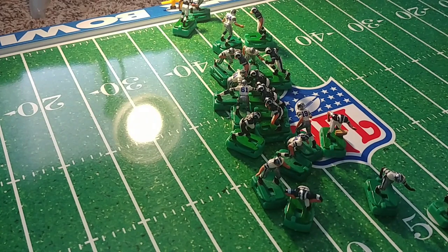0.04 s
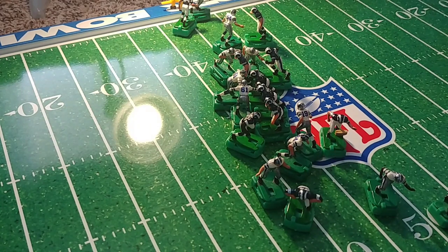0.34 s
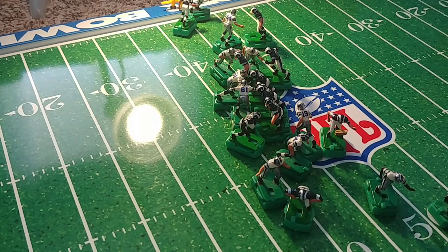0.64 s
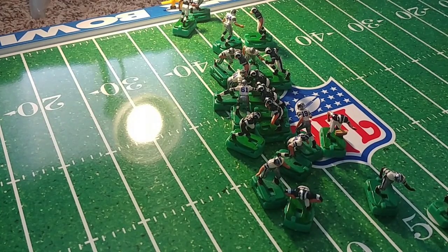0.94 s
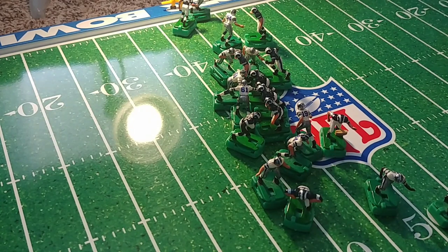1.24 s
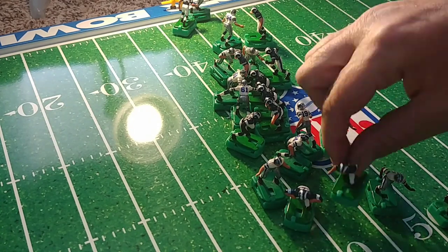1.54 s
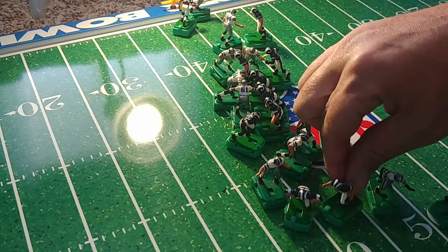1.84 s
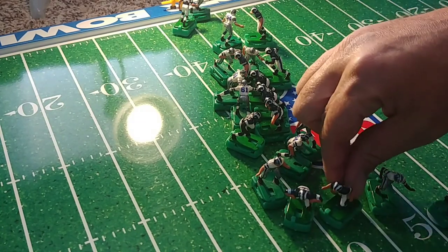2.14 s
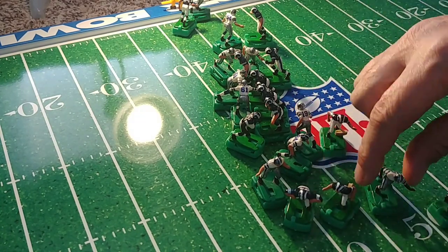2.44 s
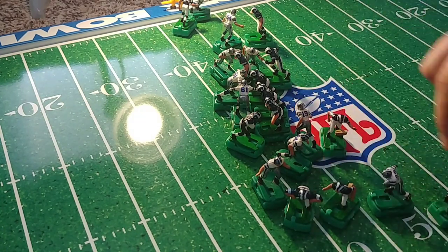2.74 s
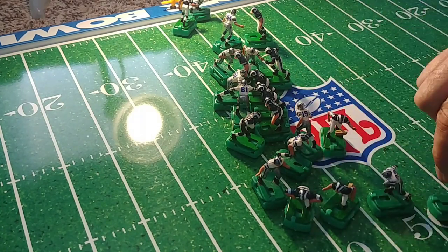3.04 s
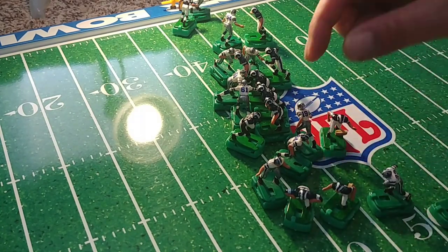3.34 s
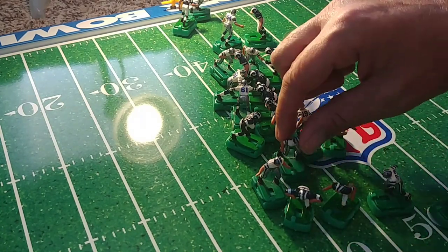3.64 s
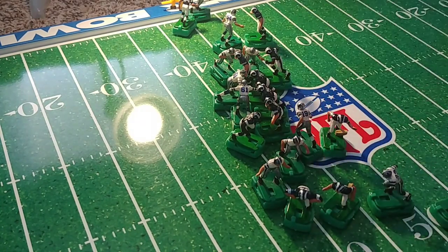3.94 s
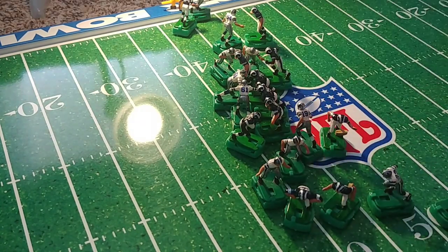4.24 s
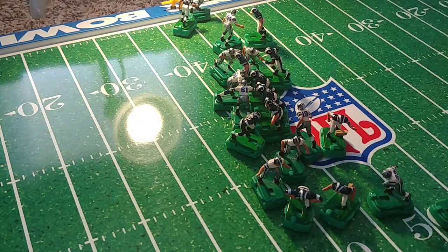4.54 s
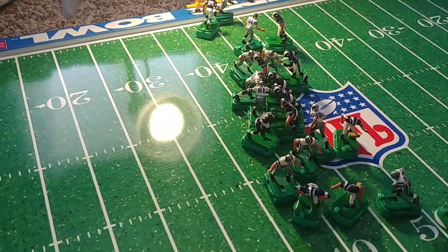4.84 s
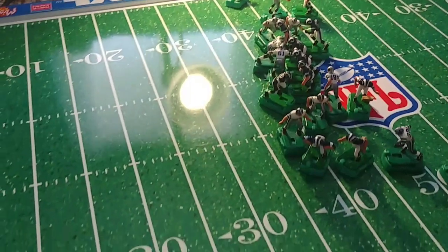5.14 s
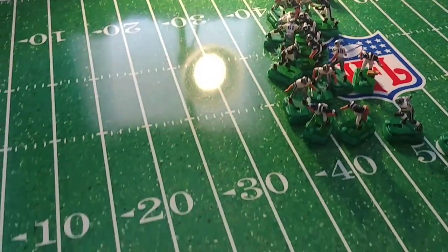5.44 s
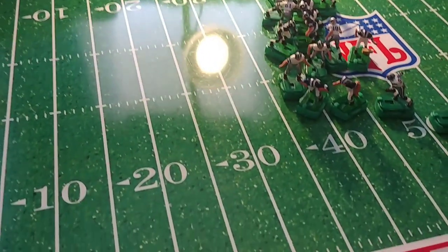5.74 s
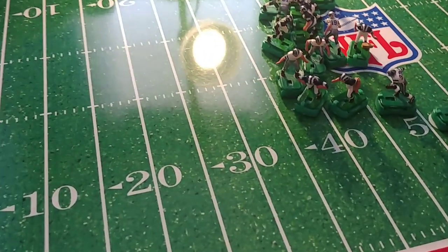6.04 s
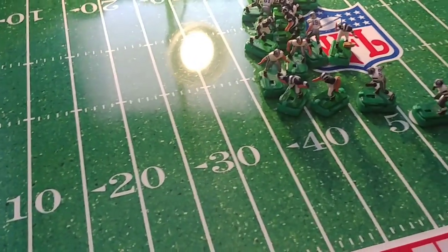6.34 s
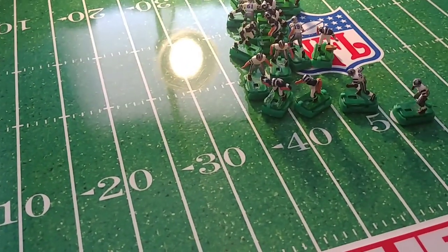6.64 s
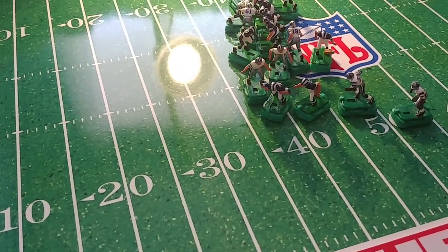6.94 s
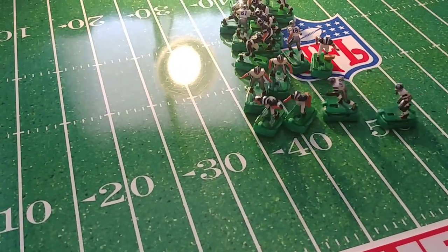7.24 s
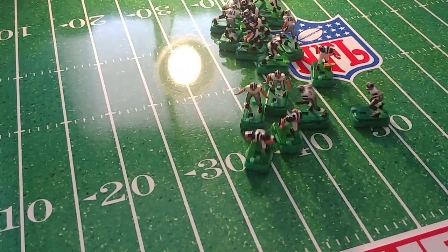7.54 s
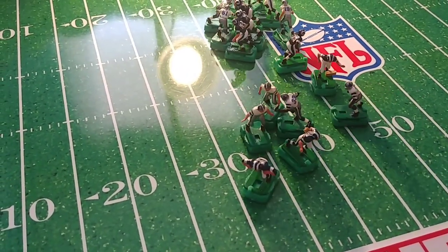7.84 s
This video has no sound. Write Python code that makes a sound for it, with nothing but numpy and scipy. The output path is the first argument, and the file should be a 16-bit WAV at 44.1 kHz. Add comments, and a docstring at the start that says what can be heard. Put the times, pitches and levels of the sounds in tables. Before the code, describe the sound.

An electric football game switches on with a snap about seven seconds in, giving a loud, bright metallic buzz mixed with the rattle of hopping plastic figures. Everything before it is much quieter: gentle taps of figures being placed, low bumps and scuffs of handling, a few hard plastic clicks, and the faint ticking and whirring of a focusing lens beside the microphone, over soft indoor ventilation.

```python
"""An electric football game: a vibrator hammers a metal sheet 120 times a second, forcing a harmonic
drone from it, and small plastic players hop and rattle on top. It starts late, with the snap of a switch.
Before that a hand sets the players on the field with soft taps, dull bumps and hard clicks, while a lens
motor close to the microphone ticks and whirs. Soft scuffs, a low rumble of a hand on the camera, faint
rustles and ventilation lie beneath, in a quiet room."""
import sys
import numpy as np
from scipy import signal
from scipy.fft import rfft, irfft, next_fast_len
from scipy.io import wavfile

SR = 44100
rng = np.random.default_rng(int(sys.argv[2]) if len(sys.argv) > 2 else 0)


def master(y):
    """Save y as 16-bit WAV."""
    cut = np.clip(np.atleast_2d(y).T, -1, 1)
    pcm = np.round(cut * 32767)  # scale
    wavfile.write(sys.argv[1], SR, pcm.astype(np.int16))


N = 348379
TIME = np.arange(N) / SR
BUZZ_HZ, CUTOFF_HZ = 119.982, 15780
SWITCH_S, FIRST_BLOW_S = 7.095, 7.107

# spectrum of a hard impact on the sheet: (frequency [Hz], relative level [dB])
SHEET_COLOUR = [(40, -17), (70, -12.5), (135, -17), (280, -6), (450, -7.5), (1100, -8.5), (2000, -5),
                (4400, -7), (5400, -4), (6800, -3), (8000, -6.5), (10300, -20), (11800, -13.5),
                (15500, -13)]
# spectrum of a soft touch: (frequency [Hz], relative level [dB])
TOUCH_COLOUR = [(80, -4), (190, 2), (350, 1.5), (620, -2), (900, -4.5), (1500, -21), (3000, -23.5),
                (8000, -35)]


def game():
    """Transient and steady state: the switch snaps, the hammer meets the sheet and keeps it vibrating."""
    # spectrum of the switch: (frequency [Hz], relative level [dB])
    snap_colour = [(300, -19), (4000, -31), (7300, 4.0), (10500, -18), (14500, -4)]
    out, t = np.zeros((2, N)), TIME[:N - int(SWITCH_S * SR)]
    drone_db, rattle_db = swing(t + SWITCH_S)
    add(out, SWITCH_S, amp(drone_db - 0.13) * drone(t) + amp(rattle_db) * rattle(t))
    add(out, SWITCH_S, amp(-9.5) * knock(snap_colour, t60=0.031, tail_db=-22, tail_t60=.15))
    add(out, FIRST_BLOW_S, amp(-15.5) * knock(SHEET_COLOUR, t60=0.056, tail_db=-17, tail_t60=0.26))
    return out


def swing(s, swing_up_s=0.0034, jolt_db=5, settle_s=0.1, ease_at_s=7.83, ease_s=0.036):
    """Exponential build-up: gains in dB of drone and rattle, which idle until the first blow."""
    since = np.maximum(s - FIRST_BLOW_S, 0)
    idle = np.exp(-since / swing_up_s)
    eased = ramp((s - ease_at_s) / ease_s)   # late on, the drone recedes and the rattle comes forward
    drone_db = -32 * idle - 4 * eased
    hopping_db = -15 + jolt_db * np.exp(-since / settle_s) + 1.5 * eased
    return drone_db, -20.5 * idle + hopping_db * (1 - idle)


def drone(t, treble_hz=4600, waver_db=1.12, slip_rad=0.19):
    """Forced vibration: periodic blows drive harmonics, which waver as the moving players load the sheet."""
    # harmonics that meet a resonance of the sheet: (harmonic number, relative level [dB],
    # drift as the players travel [dB/s], left minus right [dB], left-right correlation)
    resonances = [(2, -34.8, -1, -1, 1.0), (3, -27.2, -4, -1, 0.7), (4, -34.5, 1, -1, 0.6),
                  (5, -29.6, -1, 1, 1.0), (6, -34.9, 2, -9, -0.4), (7, -27.2, -3, 4, -1.0),
                  (8, -28.2, -4, -3, 0.3), (9, -37.3, -3, -1, 0.5), (12, -26.3, -3, 13, 0.7),
                  (14, -25.4, 0, 7, -0.9), (15, -30.1, -5, -5, 0.9), (18, -30.0, -2, 2, 0.9),
                  (24, -29.3, 3, -10, 0.8), (25, -30.0, -4, 8, -0.4), (28, -26.5, 3, -4, -0.2),
                  (32, -28.7, 3, 10, 0.7), (33, -25.4, 3, 2, -0.5), (37, -28.4, 3, -2, -1.0),
                  (43, -24.3, 10, -3, 1.0), (44, -27.9, 2, 3, 0.9), (47, -28.4, 8, 6, 0.9),
                  (51, -26.1, 1, 2, 0.8), (53, -25.7, 15, -2, 0.7), (54, -28.2, -2, -5, -0.9),
                  (55, -21.1, -4, -8, -0.9), (56, -23.9, -2, -2, -0.5), (58, -27.9, -4, 0, -0.5),
                  (60, -24.4, 4, 5, -0.9), (61, -28.1, 5, 1, -0.4), (62, -24.6, 0, 9, 0.1)]
    # envelope of all other harmonics: (frequency [Hz], relative level [dB])
    off_resonance = [(120, -53), (1200, -38), (2400, -37), (3500, -38), (4500, -37), (5800, -34),
                     (6800, -35), (7800, -35), (8600, -43), (10000, -54), (12500, -50), (15500, -51)]
    # the sheet's high modes as the players travel: (time [s], gain [dB])
    treble_curve = [(7.11, -2), (7.2, -0.5), (7.48, 0.8), (7.65, -0.8), (7.83, -1.5), (7.87, -3)]
    treble_db = np.interp(t + SWITCH_S, *np.transpose(treble_curve))
    resonant = {round(row[0]): row[1:] for row in resonances}
    out = np.zeros((2, len(t)))
    for k in range(1, int(CUTOFF_HZ / BUZZ_HZ)):
        hz = k * BUZZ_HZ
        scatter = rng.normal(size=4) * [1.8, 4, 3, 1]
        weak = (at_hz(off_resonance, hz) + scatter[0], scatter[1], scatter[2], .4 * np.tanh(scatter[3]))
        level_db, drift, pan_db, correlation = resonant.get(k, weak)
        ear_phase = np.arccos(correlation) * rng.choice([-1, 1]) * np.array([[.5], [-.5]])
        phase = 2 * np.pi * (hz * t + rng.random())
        phase += slip_rad * np.sqrt(hz / treble_hz) * wander(10.5, len(t))
        swell_db = treble_db * (hz > treble_hz) + drift * (t - t[-1] / 2)
        swell_db += waver_db * wander(8.5, len(t))
        out += np.sqrt(2) * amp(level_db + swell_db) * panned(pan_db) * np.cos(phase + ear_phase)
    return out


def rattle(t, scatter_s=.0017, uneven_db=2.5, roam_db=3.0, players=12):
    """Impact excitation: each player lands once a cycle, a little early or late, and rings the sheet."""
    # modes kept ringing: (frequency [Hz], bandwidth [Hz], relative level [dB], left minus right [dB])
    modes = [(292, 23, -22.5, -4), (2100, 65, -19, -9), (6400, 120, -13, -10), (6700, 160, -16, 0),
             (7760, 170, -8.5, 26), (8160, 200, -7, 29)]
    out, margin = np.zeros((2, len(t))), SR // 4
    cycles = np.arange(-8, t[-1] * BUZZ_HZ + 1)
    for player in range(players):
        landings = (cycles + player / players) / BUZZ_HZ + scatter_s * rng.standard_normal(len(cycles))
        blows = np.zeros(len(t) + 2 * margin)
        blows[(landings * SR).astype(int) + margin] = amp(uneven_db * rng.standard_normal(len(cycles)))
        blows *= amp(roam_db * wander(1.99, len(blows)))   # livelier and calmer spots of the field
        response = knock(SHEET_COLOUR, t60=0.12, tail_db=-10, tail_t60=0.34)
        out += signal.fftconvolve(blows[None], response, axes=1)[:, margin:margin + len(t)]
    ringing = np.zeros_like(out)
    for hz, width_hz, db, pan_db in modes:
        resonator = signal.iirpeak(hz, hz / width_hz, fs=SR)
        ringing += amp(db) * panned(pan_db) * unit(signal.lfilter(*resonator, out))
    return unit(unit(out) + 0.51 * ringing)


def clicks(crack_db=-19.0, ring_db=-10.0):
    """Free vibration: hard plastic cracks, then its damped modes reach each ear in a phase of their own."""
    # hard contacts: (time [s], relative level [dB])
    contacts = [(4.943, -50), (5.2926, -33.5), (5.3006, -38), (6.0392, -31.5)]
    # spectrum of the crack: (frequency [Hz], relative level [dB])
    colour = [(1000, -12), (2400, -9), (3700, 2), (6000, -10), (7200, -19), (12000, -33)]
    # modes of the plastic: (frequency [Hz], relative level [dB], time to fall 60 dB [s])
    modes = [(1404, -13, 0.056), (2430, -8.5, 0.059), (3530, -3, 0.096), (3696, -3, 0.067),
             (3900, -4, 0.065), (4300, -1, .04), (4500, -9, 0.088), (5160, -13, .07), (5800, -5.5, 0.054),
             (6100, -11, .05)]
    out, t = np.zeros((2, N)), TIME[:SR // 4]
    for s, db in contacts:
        ring = sum(amp(mode_db - 60 * t / t60) * np.sin(2 * np.pi * (hz * t + rng.random((2, 1))))
                   for hz, mode_db, t60 in modes)
        crack = knock(colour, t60=0.029, tail_db=-3.5, tail_t60=0.24)
        add(out, s, amp(db + ring_db) * ring + amp(db + crack_db) * crack)
    return out


def taps(gain_db=-8.0, rise_s=0.0015):
    """Soft impact: a player set down gently excites mostly the low modes of the field."""
    # players set down and nudged: (time [s], relative level [dB])
    touches = [(1.773, -42), (2.505, -49), (2.534, -51), (2.602, -51), (2.936, -51), (3.189, -50),
               (3.33, -49.5), (3.548, -46.5), (3.621, -43)]
    out = np.zeros((2, N))
    rise = 1 - np.exp(-TIME[:SR // 4] / rise_s)
    for s, db in touches:
        add(out, s, amp(db + gain_db) * rise * knock(TOUCH_COLOUR, t60=0.068, tail_db=-13, tail_t60=.3))
    return out


def bumps(gain_db=3.0, t60=0.034, flesh_s=0.0023, lead_s=.02):
    """Damped oscillation: soft flesh builds its push gradually, and the thud dies in a few cycles."""
    # bumps of the hands: (time [s], relative level [dB], frequency [Hz], left minus right [dB])
    thuds = [(1.554, -46, 105, -13), (2.509, -45, 80.7, -14), (2.932, -39.5, 76, -21),
             (2.952, -46, 76, -10), (3.004, -44.5, 86.1, -10), (3.329, -37.5, 115, 2),
             (3.345, -44.5, 115, 7), (3.62, -36, 101, 1.5), (3.637, -40, 100, 3), (4.095, -23, 81, -27),
             (4.123, -36.5, 64.6, -21), (4.777, -46.5, 80.7, 6), (6.234, -45, 99, 4),
             (6.765, -45, 72.7, 0.5)]
    out, t = np.zeros((2, N)), TIME[:SR // 4] - lead_s
    rise = np.exp(-(np.minimum(t - flesh_s, 0) / flesh_s) ** 2 / 2)
    fall = amp(-60 * np.maximum(t - flesh_s, 0) / t60)
    for s, db, hz, pan_db in thuds:
        add(out, s - lead_s, amp(db + gain_db) * panned(pan_db) * rise * fall * np.sin(2 * np.pi * hz * t))
    return out


def scuffs_and_rumble(gain_db=0.5):
    """Handling noise: short soft scuffs, and a longer low rumble of a hand handling the camera."""
    # the scuffs and the one long rumble: (start [s], length [s], relative level [dB])
    swells = [(0.05, 0.23, -63.5), (2.492, 0.085, -60), (2.578, 0.045, -61), (2.91, 0.067, -62),
              (3.592, .15, -65), (4.2, 0.77, -68.5), (6.73, .1, -65)]
    return amp(gain_db) * noise_swells(swells, TOUCH_COLOUR, flutter_db=8.0, flutter_hz=41.4)


def lens_steps(clock_start_s=.0978, period_s=.09862, jitter_s=.002, lead_s=0.0035, gain_db=-7.5):
    """Pulse train: the lens hunts for focus in short, slightly uneven steps on a steady clock."""
    # spells of stepping: (start [s], end [s], first relative level [dB], last relative level [dB])
    hunts = [(0.1, 0.2, -57.5, -59.5), (0.39, 0.59, -57, -68), (0.69, 0.79, -59, -52),
             (0.89, 1.68, -67, -62), (1.77, 2.66, -60, -60.5), (2.96, 2.96, -59, -59),
             (3.16, 3.35, -69, -67), (3.45, 4.04, -59.5, -57.5), (4.24, 4.93, -60.5, -59.5)]
    # spectrum of a step: (frequency [Hz], relative level [dB])
    colour = [(1500, -14), (3300, -3), (4400, -14), (5600, -1), (6800, -10.5), (7800, 4.5), (9000, -16.5),
              (10500, -22), (15000, -11)]
    out, t = np.zeros((2, N)), TIME[:SR // 10]
    slide = np.minimum(t / 0.0032, 1) * (np.exp(-(t / .02) ** 4) + 0.2 * np.exp(-t / .025))
    for start, end, first_db, last_db in hunts:
        first, last = [round((s - clock_start_s) / period_s) for s in (start, end)]
        ticks = clock_start_s + period_s * np.arange(first, last + 1)
        for s, db in zip(ticks, np.linspace(first_db, last_db, len(ticks))):
            late_s, uneven_db = rng.standard_normal(2) * [jitter_s, 0.8]
            add(out, s - lead_s + late_s, amp(db + gain_db + uneven_db) * slide * noise(colour, len(t)))
    return out


def lens_runs(brake_db_per_s=298, full_speed_db=-53, hiss_hz=10500, grain_db=0.4):
    """Machine noise grows louder and brighter with speed: the lens motor speeds up, whirs and brakes."""
    # unbroken runs: (start [s], time to reach speed [s], time until braking [s], level [dB])
    runs = [(5.22, .02, .025, -68), (5.489, 0.081, 0.18, -50), (5.86, .13, 0.22, -48),
            (6.04, .15, 0.21, -51), (6.396, .015, .03, -59.5), (6.78, .025, 0.027, -68)]
    # spectrum of the whir: (frequency [Hz], relative level [dB])
    colour = [(880, -43), (1500, -16), (1770, -25), (2040, -23), (2410, -16.5), (2600, -17), (3390, -11),
              (4980, -15.5), (6760, -11.5), (7760, -1.5), (8230, -5), (10600, -27.5), (12200, -18),
              (14900, -11.5), (15800, -8)]
    power = np.zeros(N)
    for start, speed_up, length, db in runs:
        braking = np.maximum(TIME - start - length, 0)
        power += (amp(db - brake_db_per_s * braking) * ramp((TIME - start) / speed_up)) ** 2
    level, whir = np.sqrt(power), noise(colour, N)
    hiss = signal.sosfiltfilt(signal.butter(2, hiss_hz, "high", fs=SR, output="sos"), whir)
    brightness = (level / amp(full_speed_db)) ** .4
    return level * amp(grain_db * wander(45, N)) * (whir + (brightness - 1) * hiss)


def rustles():
    """Modulated noise: faint dry rustles close by swell and fade unevenly."""
    # rustles: (start [s], length [s], relative level [dB])
    swells = [(4.02, .17, -70), (4.22, 0.14, -73), (4.48, .26, -73)]
    # their spectrum: (frequency [Hz], relative level [dB])
    colour = [(1000, 3), (3000, -1), (5000, -1), (7700, 0), (10000, -12), (15000, -12)]
    return noise_swells(swells, colour, flutter_db=-3.0, flutter_hz=40)


def room(move_at_s=4.85, move_s=.25):
    """A sound field varies with position: the microphone moves between two places by the table."""
    # rumble at each place: (frequency [Hz], relative level [dB])
    first_colour = [(25, -12), (50, -8.5), (80, -1.5), (135, -5.5), (220, -11.5), (400, -11), (560, -20.5),
                    (880, -15), (1100, -22.5), (1500, -19.5), (2000, -30.5), (4000, -34.5), (10000, -43.5),
                    (15500, -45)]
    later_colour = [(30, -28), (60, -3.5), (110, 0), (240, -16), (350, -7.5), (520, -20.5), (800, -19),
                    (1050, -22.5), (1450, -21.5), (2000, -31), (4000, -35), (8000, -41.5), (10000, -46),
                    (15500, -45)]
    # hums at each place: (frequency [Hz], bandwidth [Hz], level [dB])
    first_hums = [(79, 2.7, -66), (134.6, 2.7, -65.5), (341, 33, -73), (904, 19, -83.5)]
    later_hums = [(64, 4.8, -62.5), (98, 9.6, -60.5), (311, 12, -69), (368, 5.2, -67), (747, 14, -73)]
    first = ventilation(first_colour, first_hums, rumble_db=-59.5)
    later = ventilation(later_colour, later_hums, rumble_db=-56.0)
    moved = np.clip((TIME - move_at_s) / move_s + .5, 0, 1)
    return np.sqrt(1 - moved) * first + np.sqrt(moved) * later


def ventilation(colour, hums, rumble_db, pan_db=3.0):
    """Broadband and narrowband noise: a rumble with a few unsteady hums, louder on the left."""
    out = amp(rumble_db) * noise(colour, N, lean=1.0)
    for hz, width_hz, db in hums:
        phase = 2 * np.pi * hz * TIME
        hum = wander(width_hz, N) * np.cos(phase) + wander(width_hz, N) * np.sin(phase)
        out += amp(db) * panned(pan_db) * hum
    return out


def knock(colour, t60, tail_db, tail_t60):
    """Impulse response of a body with crowded modes: a fast ring, then the room's tail."""
    t = TIME[:SR // 4]
    return noise(colour, len(t)) * (amp(-60 * t / t60) + amp(tail_db - 60 * t / tail_t60))


def noise_swells(swells, colour, flutter_db, flutter_hz):
    """Amplitude modulation: bursts of noise rise and fall with a random flutter."""
    out = np.zeros((2, N))
    for s, length, db in swells:
        size = int(length * SR)
        flutter = flutter_db * np.tanh(wander(flutter_hz, size))
        add(out, s, amp(db + flutter) * np.hanning(size) * noise(colour, size))
    return out


def noise(colour, size, lean=0.0):
    """Partial coherence: coloured stereo noise of rms 1, more alike in both ears in the bass."""
    # stereo width: (frequency [Hz], side minus mid [dB])
    widths = [(40, -2.5), (150, -9.5), (330, -7.5), (600, -3.5), (1500, 1), (15000, -1)]
    # the room's lean to the left: (frequency [Hz], left minus right [dB])
    balance = [(60, 0.5), (400, 3), (900, 5), (2400, 1.5), (15000, 0)]
    padded = next_fast_len(size)
    hz = np.arange(padded // 2 + 1) * SR / padded
    mid, side = rfft(rng.standard_normal((2, padded))) * amp(at_hz(colour, hz)) * (hz < CUTOFF_HZ)
    width, sides = amp(at_hz(widths, hz)), np.array([[1], [-1]])
    ears = (mid + sides * width * side) / np.sqrt(1 + width ** 2)
    ears *= amp(sides * lean * at_hz(balance, hz) / 2)
    return unit(irfft(ears, padded)[:, :size])


def wander(rate_hz, size):
    """Band-limited noise with a spread of 1: a smooth curve through two random knots a cycle."""
    knots = int(2 * rate_hz * size / SR) + 8
    curve = unit(signal.resample(rng.standard_normal(knots), 8 * knots))
    return np.interp(np.arange(size) * (16 * rate_hz / SR), np.arange(len(curve)), curve)


def amp(db):
    """Decibels to amplitude ratio."""
    return 10 ** (np.asarray(db) / 20)


def unit(x):
    """Scale to rms 1."""
    return x / np.sqrt(np.mean(x ** 2) + 1e-20)


def at_hz(points, hz):
    """Read a spectrum on a log-frequency axis."""
    f, value = np.transpose(points)
    return np.interp(np.log(np.maximum(hz, 1)), np.log(f), value)


def panned(db):
    """Constant-power panning: left and right gains db apart."""
    return unit(amp([[db / 2], [-db / 2]]))


def ramp(x):
    """Raised-cosine rise from 0 to 1 as x goes from 0 to 1."""
    return np.sin(np.pi / 2 * np.clip(x, 0, 1)) ** 2


def add(out, s, sound):
    """Mix a sound in from time s."""
    start = int(s * SR)
    out[:, start:start + sound.shape[1]] += sound[:, :N - start]


def scene():
    """Superposition: the game, the handling and the lens motor on the left add to the room's sound."""
    background = room()
    handling = taps() + scuffs_and_rumble() + bumps() + rustles() + clicks()
    lens = (lens_steps() + lens_runs()) * panned(6.0)
    return game() + handling + lens + background


def record(dry):
    """Clipping and band limiting: full scale stops the highest peaks, and a low-pass cuts the top."""
    low_pass = signal.ellip(10, .1, 80, CUTOFF_HZ, fs=SR, output="sos")
    return signal.sosfilt(low_pass, np.clip(dry, -1, 1))


dry = scene()
out = record(dry)
master(out)
```